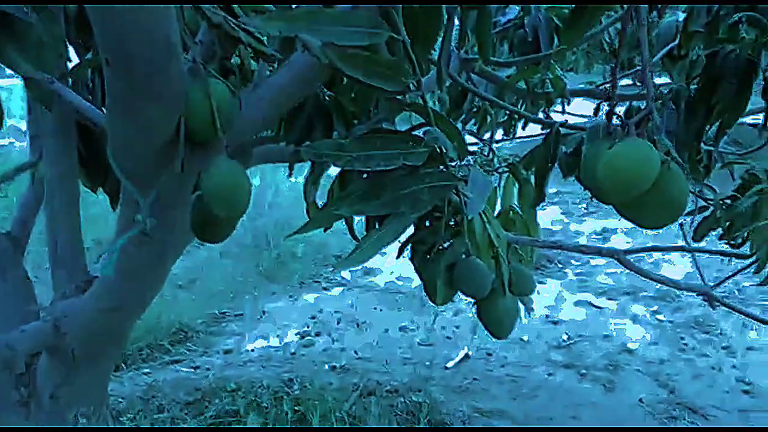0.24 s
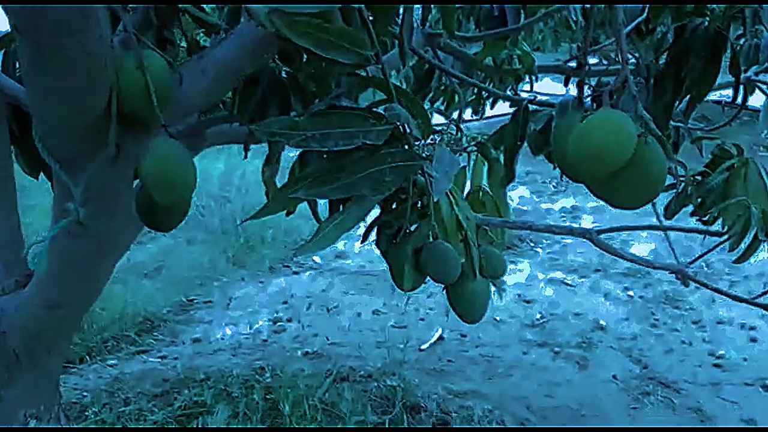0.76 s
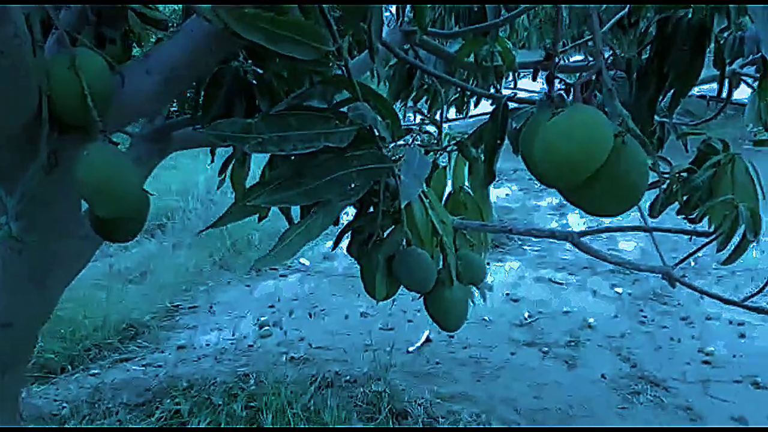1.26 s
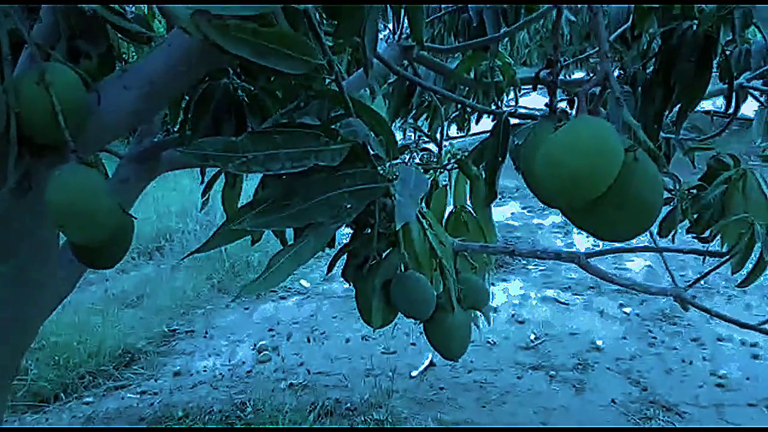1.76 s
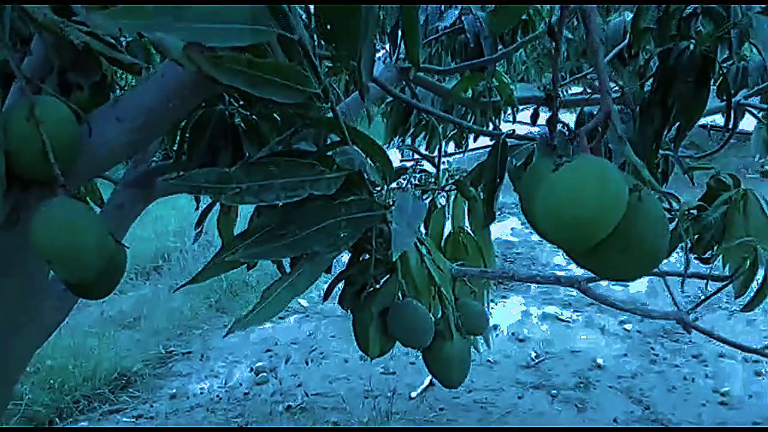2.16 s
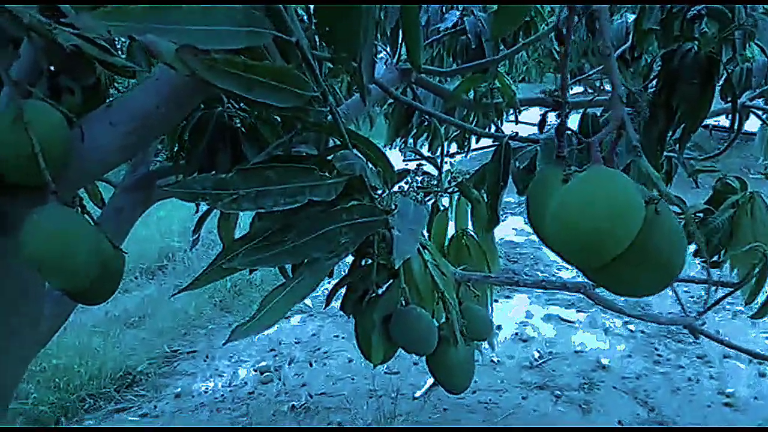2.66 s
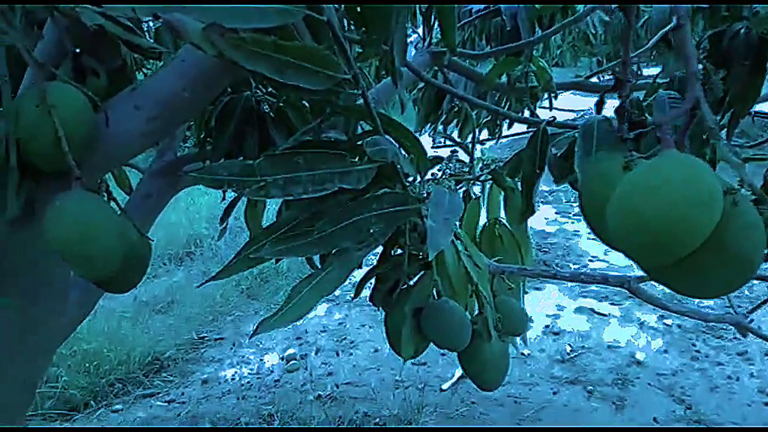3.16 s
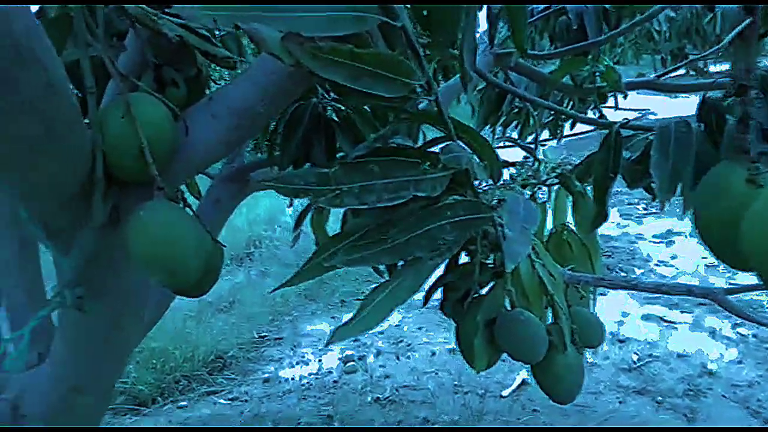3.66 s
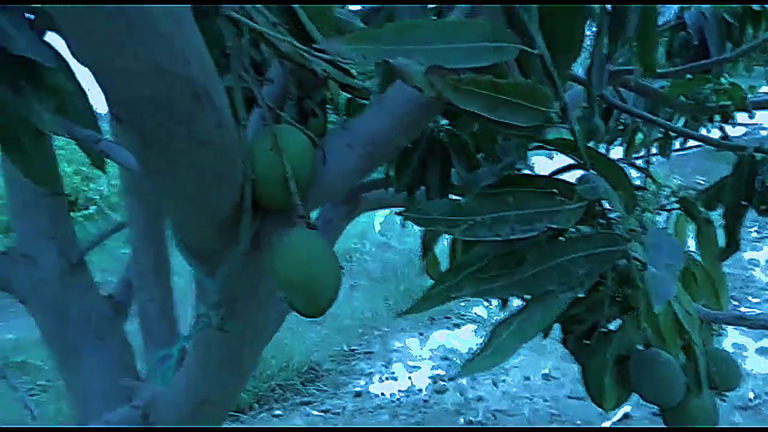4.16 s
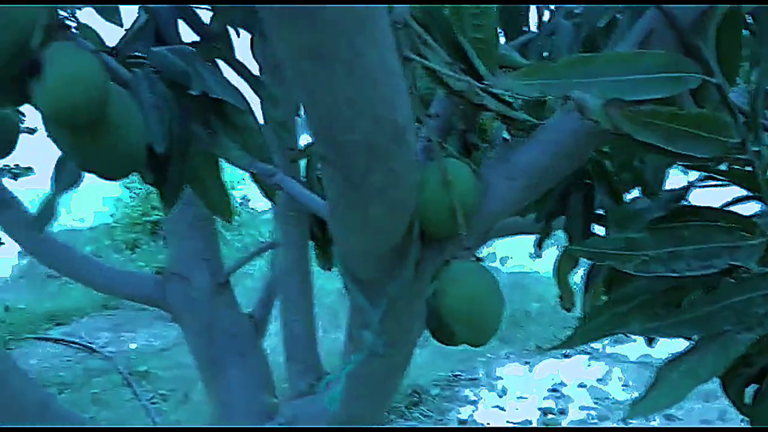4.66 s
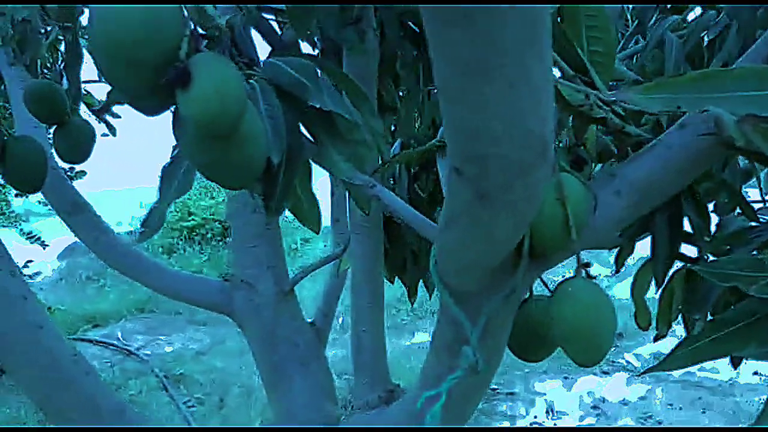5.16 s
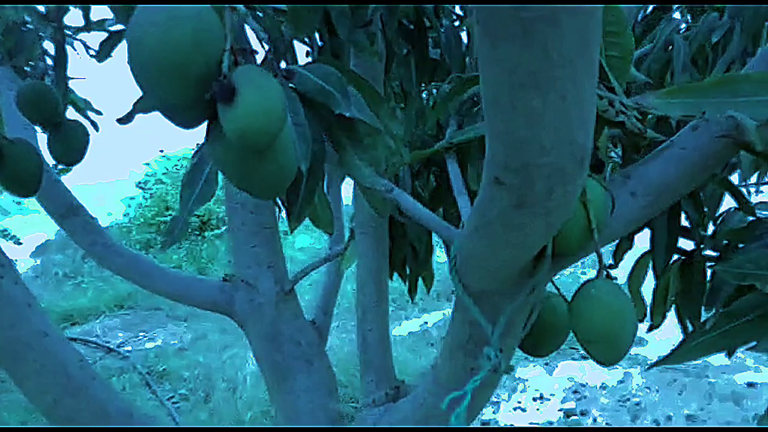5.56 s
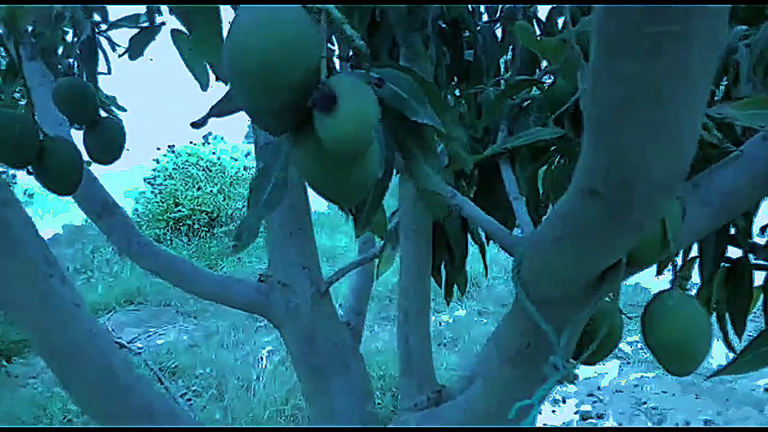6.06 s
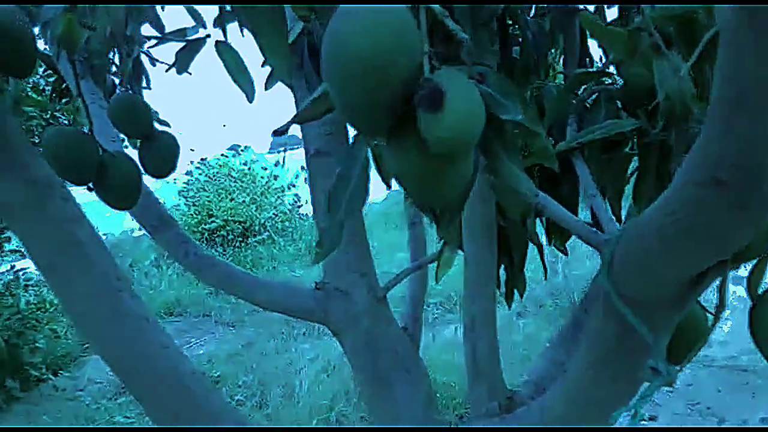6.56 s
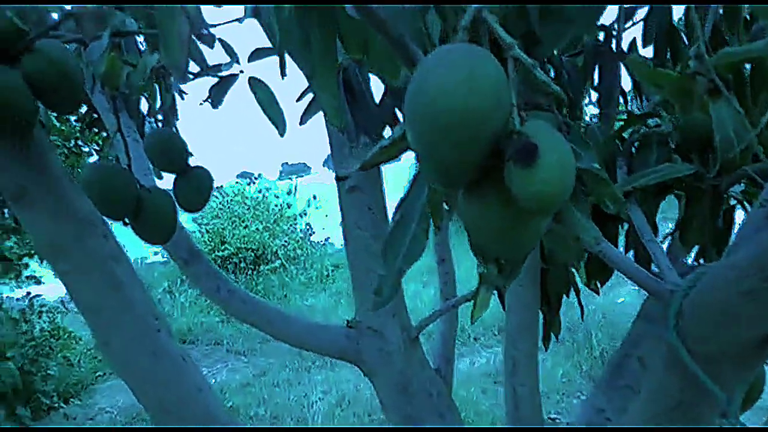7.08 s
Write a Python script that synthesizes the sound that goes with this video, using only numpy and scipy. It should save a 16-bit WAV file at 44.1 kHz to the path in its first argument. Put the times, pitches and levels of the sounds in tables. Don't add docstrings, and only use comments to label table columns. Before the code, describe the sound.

Outdoors in a fruit orchard, small birds chirp in quick, rough bursts, close calls standing over a blurred crowd farther off. A lower whistling bird answers with sliding notes, strongest just after three seconds. A soft motor-like hum and wind rumble lie beneath. The sound briefly drops out before three seconds; later, gusts thump the handheld microphone.

```python
import sys
import numpy as np
from scipy import signal
from scipy.fft import rfft, irfft, next_fast_len
from scipy.io import wavfile
from scipy.ndimage import uniform_filter1d, map_coordinates

SR = 44100
rng = np.random.default_rng(int(sys.argv[2]) if len(sys.argv) > 2 else 0)


def field_ratio(decibels):
    return 10 ** (np.asarray(decibels, dtype=float) / 20)


def put_to_file(sound):
    columns = np.atleast_2d(sound).T
    safe = np.clip(columns, -1, 1)
    whole_steps = np.round(safe * 32767)
    wavfile.write(sys.argv[1], SR, whole_steps.astype(np.int16))


N = 322812
T = np.arange(N) / SR

GAP_S = (2.763, 2.887)


def unit(x):
    return x / np.sqrt(np.mean(x ** 2) + 1e-20)


def wobble(rate_hz):
    return map_coordinates(rng.standard_normal(int(N * rate_hz / SR) + 4), [T * rate_hz])


def window(start_s, end_s, edge_s):
    return np.clip(np.minimum(T - start_s, end_s - T) / edge_s, 0, 1)


def noise(spectrum):
    size = next_fast_len(N + 8192)
    hz, db = np.transpose(spectrum)
    bins_hz = np.fft.rfftfreq(size, 1 / SR)
    gain = field_ratio(np.interp(np.log(bins_hz + 1), np.log(hz + 1), db))
    return unit(irfft(rfft(rng.standard_normal(size)) * gain, size)[:N])


def patchy(x, depth_db):
    z = signal.stft(x, nperseg=256)[2]
    field = uniform_filter1d(rng.standard_normal(z.shape), size=6, axis=0)
    field = uniform_filter1d(field, size=7, axis=1)
    return unit(signal.istft(z * field_ratio(depth_db * unit(field)), nperseg=256)[1][:N])


def trees(x, t60_s):
    out = np.zeros(N + SR)
    step, blend = SR // 4, SR // 40
    t = np.arange(SR // 3) / SR
    i = np.arange(step + blend)
    crossfade = np.clip(np.minimum(i, step + blend - i) / blend, 0, 1)
    x = np.pad(x, (blend, step))
    for k in range(0, N, step):
        tail = rng.standard_normal(len(t)) * field_ratio(-60 * t / t60_s) * (1 - np.exp(-t / 0.0008))
        echo = signal.fftconvolve(x[k:k + len(i)] * crossfade, tail / np.linalg.norm(tail))
        out[k:k + len(echo)] += echo
    return out[blend:N + blend]


def background_db():
    levels_db = (-25, -28)
    fade_in_s, fade_from_db = 0.17, -13.5
    back = T > GAP_S[1]
    fade = fade_from_db * np.clip(1 - (T - GAP_S[1]) / fade_in_s, 0, 1)
    return np.where(back, levels_db[1], levels_db[0]) + back * fade


def distant_drone(level_db):
    # frequency in Hz, density in dB per Hz.
    drone_spectrum = [(74, -13), (125, -2), (296, -5.5), (334, -5), (384, -9), (1440, -24), (1560, -24),
                      (2110, -23.5), (3480, -28), (4980, -32.5), (13300, -39.5), (15000, -49)]
    return field_ratio(level_db + 3.5 + 0.84 * wobble(12)) * noise(drone_spectrum)


def wind_rumble():
    # frequency in Hz, density in dB per Hz.
    wind_spectrum = [(7.1, -37), (12, -10), (65, -4.5), (129, -13.5), (200, -18), (260, -36.5), (440, -120)]
    # time in seconds, wind strength in dB.
    gusts = [
        (0, -24),
        (1.7, -22),
        (2.75, -21),
        (5.5, -21),
        (5.65, -17.5),
        (5.92, -22.5),
        (6.15, -17),
        (6.93, -21),
        (7.32, -19.5),
    ]
    rumble_from_s, held_low_db = 3.125, -21.5
    level_db = np.interp(T, *np.transpose(gusts)) + held_low_db * window(GAP_S[0], rumble_from_s + .02, .04)
    return field_ratio(level_db - 0.1) * unit(noise(wind_spectrum) * field_ratio(1.46 * wobble(9)))


def outbursts():
    # peak in seconds, chatter in dB, rasp above it in dB, fading in dB per s.
    bursts = [(0.019, -11, -10, 14), (0.531, -17, -6, 6), (.75, -6.5, -14.5, 72), (1.358, -19.5, -7, 23.5),
              (1.52, -8.5, -12.5, 30.5), (2.04, -23.5, -11, 22), (2.21, -7.5, -8.5, 58.5),
              (2.61, -23, -12.5, 80), (2.98, -20, -19.5, 80), (3.05, -26.5, 3.5, 15),
              (3.16, -17.5, -2.5, 12), (3.249, -10, -6, 68.5), (3.601, -17, -7, 23),
              (3.74, -24.5, -3.5, 40), (3.84, -25, -3, 32), (3.99, -20.5, -5, 40), (4.21, -11, -7.5, 34),
              (4.918, -10.5, -10.5, 51), (5.029, -9.5, -8, 35), (5.55, -20.5, -23, 84), (5.8, -15, -9, 69),
              (5.99, -17.5, -9, 12), (6.18, -15, -8.5, 49), (6.43, -16, -7.5, 41.5),
              (6.618, -10.5, -8.5, 102), (7.0, -17.5, -9, 34), (7.31, -23.5, -5.5, 40)]
    swell_db_per_s, tiring_db_per_s2 = 374.5, 44.5
    rasp_leads_s, rasp_fades_db_per_s = 0.019, 17
    quiet_db, quiet_rasp_db = -48, -38.5
    s, db, rasp_db, fade = np.transpose(bursts)[:, :, None]
    t = T[::64]
    after, before = np.maximum(t - s, 0), np.maximum(s - t, 0)
    chatter = db - swell_db_per_s * before - fade * after - tiring_db_per_s2 * after ** 2
    early = swell_db_per_s * np.minimum(before, rasp_leads_s)
    rasp = chatter + early + rasp_db - rasp_fades_db_per_s * after
    age = np.take_along_axis(after, chatter.argmax(axis=0)[None], axis=0)[0]
    chatter = np.maximum(chatter.max(axis=0), quiet_db)
    rasp = np.maximum(rasp.max(axis=0), quiet_rasp_db)
    return [np.interp(T, t, curve) for curve in (chatter, rasp, age)]


def far_flock(count=2100):
    # frequency in Hz, density in dB per Hz.
    breath_spectrum = [(3240, -18), (5500, -3), (6480, -7.5), (10000, -7.5), (11600, -14.5), (14000, -17),
                       (15000, -48)]
    eager, sag_per_s, sag_ends_s = .01, .5, .25
    chatter_db, rasp_db, age_s = outbursts()
    start, length, size, fall, top, spread = rng.random((count, 6)).T[:, :, None]
    first = (start * N).astype(int)
    t = np.arange(SR // 30) / SR
    u = np.clip(t / (.009 + 0.026 * length ** 1.5), 0, 1)
    hz = 4600 * np.exp(.31 * (top + spread - 1)) * (1 - (.08 + .4 * fall) * np.abs(u - .3))
    hz = hz * np.exp(eager - sag_per_s * np.minimum(age_s[first], sag_ends_s))
    phase = 2 * np.pi * np.cumsum(hz, axis=1) / SR
    shape = np.sin(np.pi * u) * field_ratio(-13 * size)
    where = (first + np.arange(len(t))).ravel()

    def crowd(harmonic):
        return unit(np.bincount(where, (shape * np.sin(harmonic * phase)).ravel(), N)[:N])

    tone, octave = crowd(1), crowd(2)
    tone = tone * field_ratio(1.5) + trees(tone, t60_s=.22)
    tone /= np.sqrt(np.abs(uniform_filter1d(tone ** 2, size=4000)) + 0.038)
    octave = field_ratio(-15.5) * octave + trees(octave, t60_s=0.18)
    rasp = unit(octave * field_ratio(-6.5) + patchy(noise(breath_spectrum), depth_db=6.0))
    return field_ratio(chatter_db - 3.5) * tone + field_ratio(rasp_db + 2.5) * rasp


def voice(notes, overtone_db, rough_db, shake, edge_s):
    out = np.zeros(N)
    flutter, waver = field_ratio(rough_db * wobble(260)), 1 + shake * wobble(180)
    for note in notes:
        s, hz, db = np.transpose(note)
        k = slice(round(s[0] * SR), round(s[-1] * SR))
        smooth_hz = uniform_filter1d(np.interp(T[k], s, hz), size=200, mode="nearest")
        phase = 2 * np.pi * np.cumsum(smooth_hz * waver[k]) / SR
        ramp = np.clip(np.minimum(T[k] - s[0], s[-1] - T[k]) / edge_s, 0, 1)
        size = np.sqrt(2) * field_ratio(np.interp(T[k], s, db)) * ramp * flutter[k]
        out[k] += size * (np.sin(phase) + field_ratio(overtone_db) * np.sin(2 * phase))
    return out


def shaped(rows, shape):
    return [[(s + length * u, hz * share, db + rel) for u, share, rel in shape]
            for s, length, hz, db in rows]


def near_chirps():
    # start in seconds, length in seconds, pitch in Hz, peak in dB.
    pips = [(.011, 0.049, 5000, -9), (.052, 0.049, 4950, -14), (.61, 0.033, 4120, -14),
            (.78, 0.029, 3310, -16.5), (.8, 0.054, 4420, -19), (.3, .04, 4150, -21),
            (1.565, .055, 3950, -12), (1.63, 0.088, 3650, -20), (3.138, 0.028, 3700, -15.5),
            (4.065, .04, 4140, -18), (4.225, 0.023, 4850, -8), (4.28, 0.026, 3700, -15),
            (4.901, 0.039, 5440, -10), (1.72, .035, 1800, -31.5), (5.015, 0.033, 4800, -20),
            (5.07, 0.056, 5060, -15), (5.14, 0.024, 5400, -21), (5.2, 0.068, 3950, -18.5),
            (5.315, .03, 3950, -20), (5.77, .04, 5530, -21), (5.872, 0.042, 4330, -24),
            (6.261, .05, 4960, -25), (6.47, 0.078, 3930, -18), (6.66, 0.062, 4300, -23),
            (6.805, .08, 5480, -26), (6.875, 0.082, 5650, -29.5), (7.051, .022, 3800, -17),
            (7.075, .025, 4050, -17), (7.15, 0.031, 3700, -24.5)]
    # share of length, share of pitch, level in dB.
    pip_shape = [(0, .92, -10), (.4, 1, -1.5), (1, .94, -12.5)]
    # start in seconds, length in seconds, top pitch in Hz, peak in dB.
    cheeps = [(.101, 0.057, 4870, -15), (.43, 0.053, 5350, -25), (.523, .075, 5300, -15),
              (.715, 0.09, 4480, -16), (1.336, .065, 6360, -11.5), (1.506, 0.066, 5090, -9),
              (2.01, 0.066, 5650, -26), (2.18, 0.097, 4900, -13), (2.9, 0.032, 5480, -28),
              (3.101, 0.058, 4650, -18), (3.238, 0.055, 5000, -7.5), (3.591, 0.074, 5040, -19),
              (3.981, 0.05, 5120, -12.5), (4.25, 0.061, 4670, -30), (4.37, 0.073, 5050, -19),
              (4.44, .07, 4120, -26), (5.525, .1, 4470, -25), (5.786, 0.096, 4550, -19.5),
              (5.97, 0.091, 5400, -20), (6.165, 0.068, 5230, -13), (6.41, 0.059, 5000, -10.5),
              (6.585, 0.061, 5120, -13.5), (6.97, 0.063, 5180, -20.5), (7.1, 0.044, 4430, -24),
              (7.27, 0.052, 5930, -24.5)]
    # share of length, share of top pitch, level in dB.
    cheep_shape = [(0, .82, -10), (.25, 1, -0.5), (.6, .8, -7), (1, .73, -16)]
    # start in seconds, end in seconds, from
    # Hz, to Hz, level in dB.
    glides = [(0.036, 0.042, 5070, 2970, -25), (.066, 0.093, 3130, 4320, -19),
              (0.09, 0.098, 4500, 2790, -13), (0.717, 0.727, 3060, 4470, -18),
              (1.328, 1.35, 3650, 4400, -26), (1.362, 1.403, 6040, 3870, -17),
              (1.486, 1.534, 6330, 9770, -18.5), (2.17, 2.189, 5500, 8400, -21.5),
              (2.23, 2.29, 3570, 2720, -28), (2.661, 2.706, 2790, 2150, -26.5),
              (4.194, 4.218, 5350, 6250, -18.5), (3.177, 3.206, 1885, 2390, -19.5),
              (3.245, 3.268, 1844, 1810, -26), (4.267, 4.31, 3650, 2730, -28),
              (1.403, 1.434, 4250, 4610, -12), (1.432, 1.467, 4590, 4010, -17),
              (4.899, 4.921, 4310, 5410, -18.5), (5.002, 5.035, 6550, 6300, -6.5),
              (1.753, 1.777, 3880, 5300, -23.5), (5.244, 5.259, 4260, 6060, -22),
              (5.757, 5.794, 5130, 6640, -24), (5.854, 5.908, 3660, 2360, -30.5),
              (6.626, 6.719, 4370, 2360, -33)]
    calls = shaped(cheeps, cheep_shape) + shaped(pips, pip_shape)
    chirps = voice(calls, overtone_db=-17, rough_db=3.5, shake=.012, edge_s=.006)
    slides = [[(a, first, db), (b, last, db)] for a, b, first, last, db in glides]
    chirps += field_ratio(1.5) * voice(slides, overtone_db=-17, rough_db=4.5, shake=.02, edge_s=.004)
    chirps += field_ratio(-9.5) * np.roll(chirps, 420) + field_ratio(-11.5) * np.roll(chirps, 950)
    return chirps + field_ratio(-7.5) * trees(chirps, t60_s=.22)


def whistler():
    # start in seconds, length in seconds, first pitch in Hz, held pitch in Hz, peak in dB.
    whistles = [(0.171, .04, 2700, 2704, -14.5), (0.313, 0.018, 2810, 2380, -20.5),
                (0.323, 0.066, 2234, 2430, -18.5), (0.421, 0.028, 2890, 2320, -23.5),
                (1.228, .065, 2160, 2400, -27), (1.879, .06, 2230, 2383, -21),
                (2.07, 0.053, 2280, 2600, -17), (2.511, 0.041, 2190, 2240, -23),
                (2.597, .025, 2790, 2430, -21.5), (2.621, 0.0387, 2445, 2770, -21),
                (2.981, 0.055, 1816, 1810, -28), (3.121, 0.051, 2180, 2440, -5),
                (3.31, .048, 2290, 2610, -5.5), (3.358, .045, 3250, 2890, -14),
                (3.525, .03, 1890, 2260, -12), (3.602, .022, 2440, 2800, -15),
                (3.659, 0.031, 2120, 1935, -22), (3.729, 0.042, 1850, 2277, -11),
                (3.818, 0.045, 2700, 2586, -11.5), (3.859, 0.056, 2850, 2960, -20.5),
                (3.902, 0.057, 2630, 2230, -11.5)]
    slide_share, onset_db, release_db = 0.445, -7, -10
    notes = [[(s, first, db + onset_db), (s + slide_share * length, held, db),
              (s + length, held, db + release_db)]
             for s, length, first, held, db in whistles]
    dry_notes = voice(notes, overtone_db=-38, rough_db=3, shake=.014, edge_s=.007)
    return dry_notes + field_ratio(-5.5) * trees(dry_notes, t60_s=.5)


def far_coos():
    # start in seconds, end in seconds, pitch in Hz, level in dB.
    coos = [
        (0.83, 1.327, 1560, -36),
        (4.3, 4.85, 1600, -44),
        (3.3, 3.7, 850, -41),
    ]
    tones = sum(field_ratio(db) * window(a, b, 0.034) * np.sin(2 * np.pi * hz * T) for a, b, hz, db in coos)
    return tones * field_ratio(2.1 * wobble(19))


def far_pump(level_db):
    # frequency in Hz, width in Hz, level in dB, start in seconds.
    pump_lines = [(157, 30, -38, 1), (291.2, 13.3, -29, 3), (392, 72, -33.5, -3)]
    hum = sum(field_ratio(db) * (T > s) * noise([(hz - 2 * width, -40), (hz, 0), (hz + 2 * width, -40)])
              for hz, width, db, s in pump_lines)
    return hum * field_ratio(level_db + 26.5)


def leaf_rustle():
    brush = (3.0, 3.5, -31)
    # frequency in Hz, density in dB per Hz.
    leaf_spectrum = [(500, -30), (900, 1), (2000, -4), (5000, -14.5), (9000, -40)]
    return field_ratio(brush[2]) * window(*brush[:2], .06) * patchy(noise(leaf_spectrum), depth_db=4.0)


def diaphragm_shift():
    push = (3.155, 3.33, -14)
    return field_ratio(push[2]) * window(*push[:2], 0.011) * (1 + .2 * wobble(25))


def twig_snaps():
    # time in seconds, peak in dB.
    snaps = [
        (5.389, -15),
        (7.18, -21),
    ]
    fizz = np.diff(rng.standard_normal(N + 3), 3) / 1.7
    return fizz * sum(field_ratio(db - 60 * np.clip(T - s, 0, 1) / .006) * (T > s) for s, db in snaps)


def wind_slaps():
    # time in seconds, peak in dB.
    slaps = [
        (5.632, 1),
        (5.642, -3),
        (5.674, -11),
        (6.225, -5.5),
        (6.309, -8),
        (6.348, -2.5),
        (6.459, -10),
        (6.719, -13),
        (6.826, -4),
        (6.852, 1.5),
    ]
    out = np.zeros(N)
    for s, db in slaps:
        u = (T - s - .004) / 0.0032
        out += field_ratio(db - 3.5) * (1 - 0.52 * u * u) * np.exp(-u * u / 2)
    return out


def scene():
    level_db = background_db()
    air = distant_drone(level_db) + far_pump(level_db) + wind_rumble() + wind_slaps() + diaphragm_shift()
    birds = far_flock() + near_chirps() + whistler() + far_coos()
    return (birds + air + leaf_rustle() + twig_snaps())[None]


def thinned(x, keep_db, scatter_db, floor_db):
    hz, _, z = signal.stft(x, SR, window="cosine", nperseg=2048)
    power = np.abs(z) ** 2
    drift = unit(uniform_filter1d(rng.standard_normal((86, z.shape[2])), size=3))
    scatter = field_ratio(2 * scatter_db * np.repeat(drift, 12, axis=0)[:len(hz)])
    khz = hz[:, None] / 1000
    nearby = uniform_filter1d(power, size=40, axis=1)
    masking = field_ratio(2 * (keep_db + 0.92 * khz)) * nearby * (khz > 2.9)
    treble = field_ratio(2 * floor_db + 20 * (khz - 13))
    kept = z * (power > scatter * (masking + treble))
    return signal.istft(kept, SR, window="cosine", nperseg=2048)[1][:, :N]


def roll_off(x):
    return signal.sosfilt(signal.butter(12, 15380, fs=SR, output="sos"), x)


def record(dry):
    on = 1 - window(GAP_S[0] - .004, GAP_S[1] + 0.003, 0.0037)
    coarse = thinned(dry, keep_db=-12.5, scatter_db=6.5, floor_db=-67.0)
    return roll_off(np.clip(coarse * on, -1, 1))


dry = scene()
out = record(dry)
put_to_file(out)
```